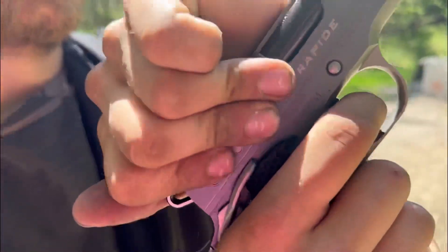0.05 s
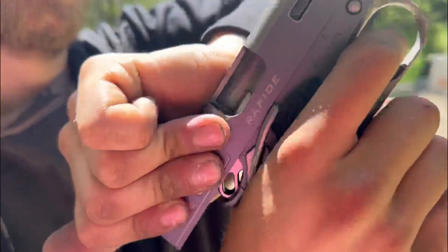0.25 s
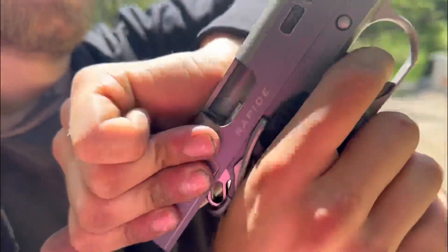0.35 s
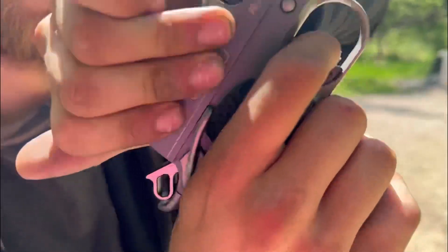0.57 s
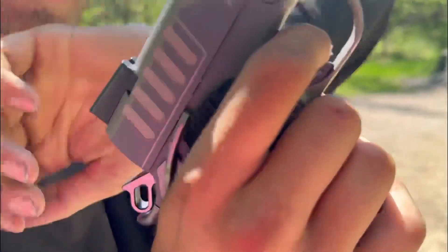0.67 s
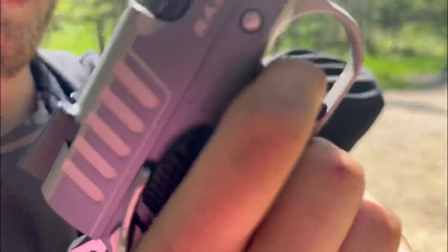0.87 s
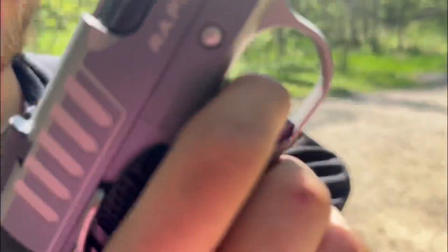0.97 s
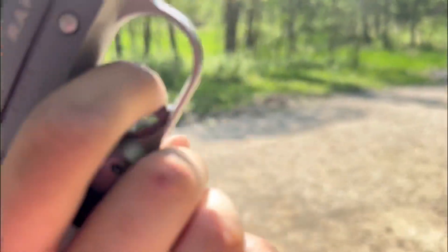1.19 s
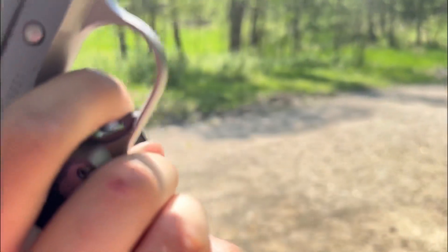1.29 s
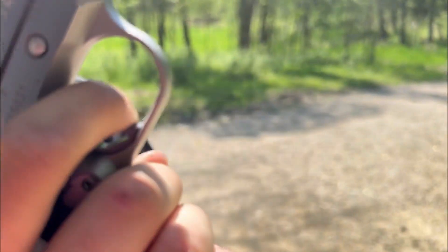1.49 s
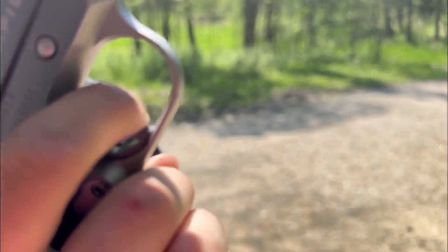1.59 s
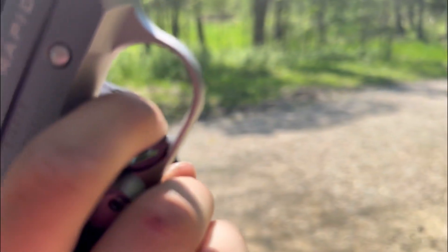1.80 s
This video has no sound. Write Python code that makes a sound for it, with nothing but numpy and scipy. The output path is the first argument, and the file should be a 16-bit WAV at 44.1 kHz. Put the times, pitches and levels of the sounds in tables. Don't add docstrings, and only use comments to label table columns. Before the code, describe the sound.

Empty handgun slide pulled back and snapped shut with crisp metallic clicks, then faint finger taps

```python
import sys
import numpy as np
from scipy import signal
from scipy.fft import rfft, irfft, next_fast_len
from scipy.io import wavfile
from scipy.ndimage import uniform_filter1d, map_coordinates

SR = 44100
rng = np.random.default_rng(int(sys.argv[2]) if len(sys.argv) > 2 else 0)


def to_linear_factor(level_db):
    exponent = np.asarray(level_db, float) / 20
    return 10 ** exponent


def file_out(sig):
    cols = np.atleast_2d(sig).T
    lim = np.clip(cols, -1, 1)
    pcm = np.round(lim * 32767).astype(np.int16)
    wavfile.write(sys.argv[1], SR, pcm)


N = 81585

# [f/Hz, correlation]
LIKENESS = [(60, 0.21), (380, 0.6), (2380, 0.027), (15000, 0.034)]


def unit(x):
    return x / np.sqrt(np.mean(x ** 2) + 1e-20)


def along(points, hz):
    f, v = np.transpose(points)
    return np.interp(np.log(hz + 1), np.log(f + 1), v)


def level(rows):
    s, db = np.transpose(rows)
    return to_linear_factor(np.interp(np.arange(N) / SR, s, db, left=-120, right=-120))


def wobble(rate_hz):
    knots = rng.standard_normal(int(N * rate_hz / SR) + 4)
    return map_coordinates(knots, [np.arange(N) * rate_hz / SR])


def filtered(x, response):
    m = next_fast_len(N + SR // 2)
    f = np.fft.rfftfreq(m, 1 / SR) + 1e-3
    return irfft(rfft(x, m) * response(f), m)[..., :N]


def add(track, s, x):
    part = track[..., round(s * SR):][..., :x.shape[-1]]
    part += x[..., :part.shape[-1]]


def peak(f, hz, width_hz):
    return 1j * f * width_hz / (hz * hz - f * f + 1j * f * width_hz)


def rush(spectrum, alike):
    def mid_side(f):
        angle = np.arccos(np.clip(along(alike, f), -1, 1)) / 2
        return to_linear_factor(along(spectrum, f)) * [np.cos(angle), np.sin(angle)]

    mid, side = filtered(rng.standard_normal((2, N)), mid_side)
    return unit(np.array([mid + side, mid - side]))


def patchy(x, depth_db):
    z = signal.stft(x, nperseg=512)[2]
    field = uniform_filter1d(rng.standard_normal(z.shape[1:]), size=9, axis=0)
    field = uniform_filter1d(field, size=12, axis=1)
    return unit(signal.istft(z * to_linear_factor(depth_db * unit(field)), nperseg=512)[1][:, :N])


def wind():
    # [t/s, level/dB]
    gusts = [(0, -69.5), (.7, -70.5), (.92, -70.5), (1.0, -65.5), (1.6, -73.5), (1.74, -66.5), (1.85, -75)]
    # [f/Hz, level/dB]
    rumble_spectrum = [(20, -13.5), (50, 1.5), (130, -12), (260, -44)]
    # [t/s, level/dB]
    air = [(0, -73), (.55, -71), (.85, -67.5), (1.1, -67.5), (1.5, -70.5), (1.6, -72), (1.85, -73)]
    # [f/Hz, level/dB]
    leaf_spectrum = [(59, -34), (100, 0), (302, -1.5), (1500, -13.5), (3600, -19.5), (5500, -24),
                     (16000, -48.5)]
    rumble = to_linear_factor(1.0 + 2.7 * wobble(11)) * level(gusts) * rush(rumble_spectrum, [(50, 1.0)])
    leaves = patchy(rush(leaf_spectrum, LIKENESS), depth_db=2.0)
    return rumble + to_linear_factor(3.5 + 0.72 * wobble(25)) * level(air) * leaves


def trees(x, t60_s):
    t = np.arange(SR // 2) / SR
    tail = rng.standard_normal((2, len(t))) * to_linear_factor(-60 * t / t60_s) * (t > .012)
    tail = uniform_filter1d(tail, size=5)
    return signal.fftconvolve(x[None], tail / np.linalg.norm(tail[0]), axes=1)[:, :N]


def birds():
    # [t/s, length/s, start f/Hz, end f/Hz, level/dB]
    notes_sung = [(1.091, 0.041, 1390, 1360, -71), (1.207, 0.061, 6570, 6660, -72),
                  (1.275, .095, 7750, 5400, -70), (1.466, 0.0309, 6500, 5100, -72),
                  (1.531, 0.044, 4305, 4300, -72), (1.59, 0.078, 4680, 4520, -68),
                  (1.71, 0.0714, 4440, 4652, -73.5), (1.796, 0.066, 5230, 6200, -69),
                  (1.84, 0.048, 5050, 5113, -74), (1.755, 0.11, 2900, 3150, -78.5),
                  (0.924, .06, 1330, 1377, -74.5), (1.09, 0.11, 4700, 5300, -81.5),
                  (1.005, .04, 6300, 5500, -79.5), (.70, .11, 3000, 2400, -76)]
    glide, wet_db = 4.2, -2
    out = np.zeros(N)
    for s, length_s, from_hz, to_hz, db in notes_sung:
        u = np.arange(round(length_s * SR)) / (length_s * SR)
        jitter_hz = 14 * unit(uniform_filter1d(rng.standard_normal(len(u)), size=150))
        hz = to_hz + (from_hz - to_hz) * np.exp(-glide * u) + jitter_hz
        flutter = to_linear_factor(5 * unit(uniform_filter1d(rng.standard_normal(SR // 5), size=200))[:len(u)])
        whistle = np.sin(2 * np.pi * np.cumsum(hz) / SR)
        add(out, s, 0.73 * to_linear_factor(db) * np.sin(np.pi * u) ** 0.12 * flutter * whistle)
    return out * to_linear_factor([[1.5], [-1.5]]) + to_linear_factor(wet_db) * trees(out, 0.19)


def squeaks():
    # [t/s, length/s, start f/Hz, end f/Hz, level/dB]
    slips = [
        (.864, 0.0243, 1376, 907, -61.5),
        (1.415, 0.039, 1430, 583, -60.5),
    ]
    out = np.zeros(N)
    for s, length_s, from_hz, to_hz, db in slips:
        u = np.arange(round(length_s * SR)) / (length_s * SR)
        hz = from_hz * (to_hz / from_hz) ** u
        add(out, s, to_linear_factor(db) * np.sin(np.pi * u) ** .5 * np.sin(2 * np.pi * np.cumsum(hz) / SR))
    return out * to_linear_factor(3 * wobble(300))


def fingers():
    # [t/s, peak level/dB, f/Hz, snap level/dB]
    ticks = [(0.594, -47.5, 1400, -18), (.606, -54, 1080, 1), (0.6246, -50.5, 1100, -4),
             (.6238, -48, 2170, -25), (0.6388, -51, 1160, -25), (0.6497, -37, 1420, -35),
             (0.6492, -43.5, 725, -22), (0.66, -40.5, 1000, -13), (0.678, -49, 1300, -15),
             (.69, -53.5, 1100, -18), (1.014, -54, 400, -8), (1.075, -51, 400, -6.5),
             (1.104, -60, 1300, -4), (1.182, -57.5, 1500, -11), (1.218, -45, 520, -8),
             (1.221, -47.5, 2300, -23), (1.28, -48, 590, -3.5), (1.322, -48.5, 974, -32),
             (1.363, -44, 1810, -15.5), (1.38, -42.5, 1890, -21.5), (1.388, -41.5, 648, -18),
             (1.397, -53, 740, -2.5), (1.439, -49, 710, -14), (1.576, -65, 1500, -1),
             (1.614, -57.5, 2000, -9.5), (1.734, -57, 3000, 0.5)]
    # [t/s, level/dB]
    rub = [(.95, -71), (1.1, -75.5), (1.3, -73), (1.355, -68.5), (1.375, -54.5), (1.41, -62), (1.55, -80.5)]
    # [f/Hz, level/dB]
    rub_spectrum = [(180, -28.5), (300, -3.5), (1850, -11), (2210, -20.5), (5260, -21), (15000, -41)]
    tap_cycles, tap_db, snap_t60_s = 2.8, 2, .006
    out, t = np.zeros((2, N)), np.arange(SR // 40) / SR
    for s, db, hz, snap_db in ticks:
        tap = np.exp(-t * hz / tap_cycles * 2) * np.sin(2 * np.pi * hz * t)
        tap = tap * to_linear_factor(tap_db) * (1 - np.exp(-t * hz * 2))
        snap = uniform_filter1d(rng.standard_normal((2, len(t))), size=6)
        snap = snap * to_linear_factor(snap_db + 12 - 60 * t / snap_t60_s)
        add(out, s, to_linear_factor(db) * (tap * to_linear_factor([[1.5], [-1.5]]) + snap))
    return out + to_linear_factor(4 * wobble(250)) * level(rub) * rush(rub_spectrum, LIKENESS)


def thuds():
    # [t/s, level/dB, cutoff f/Hz]
    jolts = [
        (.244, -34.5, 149),
        (0.2619, -14.5, 125),
        (0.3061, -27.5, 212),
        (0.408, -40, 246),
        (0.426, -39.5, 208),
        (.437, -36, 252.4),
        (0.478, -33.5, 200),
        (.500, -43, 300),
        (1.158, -40.5, 58.5),
        (1.72, -46, 59.9),
    ]
    # [t/s, level/dB]
    tremor = [(.3, -55.5), (.34, -48), (.42, -43.5), (.47, -61), (.56, -57), (.65, -54), (.75, -80)]
    tremor_hz, lead_rad = 47, .1
    out, freq_hz = np.zeros(N), np.fft.rfftfreq(4096, 1 / SR)
    for s, db, hz in jolts:
        push = irfft(1 / (1 + 1j * freq_hz / hz) ** 2.45)[:2048]
        add(out, s, -to_linear_factor(db) * push / push.max())
    shake = np.sin(2 * np.pi * np.cumsum(tremor_hz + 4.2 * wobble(6.5)) / SR)
    out = out + level(tremor) * shake
    return filtered(out, lambda f: np.exp([[1j * lead_rad], [-1j * lead_rad]]) + 0 * f)


def scrape():
    # [t/s, level/dB]
    sliding = [(.15, -67), (.21, -54), (.231, -49), (.242, -26.5), (.266, -32.5), (.29, -42.5),
               (.35, -61.5), (.396, -57), (.408, -46), (.434, -40.5), (.441, -42), (.471, -26),
               (.4735, -52.5), (.485, -41.5), (.53, -56.5), (.59, -64.5), (.62, -61), (.78, -81)]
    # [f/Hz, level/dB]
    rails = [(350, -43), (600, -11.5), (3690, 0), (5830, -4.5), (9090, -2), (15000, -23.5), (16500, -24.5)]
    grit_per_s, grit_db, grit_spread_db = 800, -0.5, -5.5
    draw = rng.random((2, N))
    grit = (draw[0] < grit_per_s / SR) * to_linear_factor(-grit_spread_db * np.log(draw[1]))
    rough = 1 + to_linear_factor(grit_db) * unit(uniform_filter1d(grit, size=12))
    drive = rng.standard_normal((2, N)) * rough * to_linear_factor(2.5 * wobble(200))
    return level(sliding) * unit(filtered(drive, lambda f: to_linear_factor(along(rails, f))))


def rings():
    # [t/s, f/Hz, level/dB, t60/s]
    modes = [(.1765, 4330, -48, 0.017), (.1765, 1760, -47.5, 0.045), (.2062, 1060, -14.5, 0.018),
             (.2068, 4800, -18, 0.018), (.2075, 3355, -25, 0.036), (.2178, 3426, -22, 0.027),
             (.2216, 1680, -15.5, 0.014), (.222, 4200, -11, 0.009), (.2218, 8090, -10.5, .004),
             (.2428, 1105, -26, 0.038), (.2428, 3230, -26, 0.028), (.247, 3820, -27.5, 0.023),
             (.2618, 3600, -11, 0.013), (.261, 1846, -12, .013), (.2612, 1150, -23, 0.023),
             (.2622, 5230, -25, 0.065), (.2645, 8850, -26.5, .045), (.2735, 1940, -29, 0.049),
             (.2745, 3670, -30, .022), (.4374, 4620, -30.5, 0.0072), (.4376, 9560, -19, 0.01),
             (.4462, 1486, -31, 0.023), (.4662, 9630, -8, 0.0071), (.4665, 5000, -22.5, 0.0086),
             (.4782, 2108, -13.5, 0.035), (.478, 1140, -25.5, 0.0045), (.4775, 595, -22.5, 0.012),
             (.478, 4985, -15, 0.0075), (.488, 2490, -32, 0.058)]
    out, t = np.zeros((2, N)), np.arange(SR // 5) / SR
    for s, hz, db, t60_s in modes:
        drift_rad = np.cumsum(rng.normal(0, .07, (2, len(t))), axis=1)
        onset = (1 - np.exp(-t * hz * 1.04)) ** 2
        add(out, s, to_linear_factor(db - 60 * t / t60_s) * np.sin(2 * np.pi * hz * t + drift_rad) * onset)
    return out


def contacts():
    times_s = [.1182, .1252, .172, .1763, .2064, .2173, .2214, .2422, .2455, .2606, .262, .2745, .2844,
               .4005, .409, .4372, .4442, .4472, .4575, .4659, .4695, .4778, .624]
    # [peak level/dB, frame modes/dB, slide modes/dB, chatter length/ms]
    strengths = [(-49, -8, -6, 2.9), (-48.5, -0.5, -17.5, 2.6), (-44, -20.5, -10, 3.3), (-43, -2, -5, 6.6),
                 (-4.5, -19.5, -12.5, 3.5), (-13.5, -14.5, -6, 2.7), (-8, -17.5, -5.5, 1.8),
                 (-16.5, -21.5, -13, 6), (-22.5, -13, -7, 3), (-7.5, -21, -7, 2.7), (-15.5, -13, -2, 1.5),
                 (-35, -9, -3, 1.6), (-24, -18.5, -6, 1.5), (-32.5, -18, -11, 2.3), (-27.5, -21, -12.5, 9),
                 (-18.5, -17.5, -20, 1.6), (-29, -12.5, -11.5, 1.5), (-17.5, -23, -13, 4.4),
                 (-21, -15, -12, 3.8), (-6.5, -21, -12.5, 1.3), (-22.5, -9.5, -8, 0.99),
                 (-9, -12, -1.5, 1.1), (-54.5, -13, -10, 4)]
    # [f/Hz, width/Hz, level/dB]
    steel = [(1130, 140, -3), (1670, 190, -3), (2090, 88, -4), (3750, 260, -1), (4170, 88, -2),
             (5280, 37, -3), (9000, 150, 0), (10100, 90, -3)]
    widen, min_width_hz, broad_db = 1.3, 300, -7.5
    rise_s, top_s, spike, blow = .0003, .004, 2.3, 8.3
    t, size = np.arange(1024) / SR, 2048
    f, out = np.fft.rfftfreq(size, 1 / SR), np.zeros((2, N))
    frame = 1 / (1 + (f / 2700) ** 8)
    parts = 1 / (1 + (6500 / (f + 1)) ** 8)
    ends = to_linear_factor(along([(420, -29.5), (850, -5), (12500, 3.0), (17000, -13)], f))
    for s, (db, frame_db, slide_db, length_ms) in zip(times_s, strengths):
        shape = np.minimum(np.exp((t - top_s) / rise_s), np.exp((top_s - t) * 2000 / length_ms))
        chatter = rng.standard_normal((2, len(t))) * (shape + spike * shape ** 4)
        chatter[0, round(top_s * SR)] += blow
        scatter_db = rng.normal(0, 2, len(steel))
        body = to_linear_factor(broad_db)
        for k, (hz, width_hz, mode_db) in enumerate(steel):
            mode = peak(f, hz, max(widen * width_hz, min_width_hz))
            body = body + (-1) ** k * to_linear_factor(mode_db + scatter_db[k]) * mode
        for share, part_db in (frame, frame_db), (1 - frame - parts, slide_db), (parts, 0):
            hit = irfft(rfft(chatter, size) * body * ends * share, size)
            add(out, s - .0035, to_linear_factor(db + part_db) * hit / np.abs(hit[0]).max())
    return out


def ports(x):
    # [f/Hz, phase/rad]
    lead = [(0, 0), (1000, .6), (1700, .9), (2300, 4.7), (3500, 7.9), (5000, 8), (8100, 8.7), (11000, 6.4),
            (13600, 5.2), (16000, 4)]
    # [f/Hz, level/dB]
    lean = [(300, -1), (1000, 3.5), (2400, 1), (5000, 6.5), (9000, 5.5), (15000, -4.5)]
    spread = .3
    pair = np.array([x[0] + spread * x[1], x[0] - spread * x[1]])
    side = np.array([[.5], [-.5]])

    def response(f):
        phase_rad = np.interp(f, *np.transpose(lead))
        return to_linear_factor(side * along(lean, f)) * np.exp(1j * side * phase_rad)

    return filtered(pair, response)


def scene():
    gun = contacts()
    forest = wind() + birds() + to_linear_factor(-29) * trees(gun[0], t60_s=.33)
    hand = squeaks() + fingers() + thuds()
    return forest + hand + ports(gun + rings() + scrape())


def roll_off(x):
    return signal.sosfilt(signal.butter(12, 17040, fs=SR, output="sos"), x)


def record(dry):
    lag_cycles, low_hz, low_q = 1.2, 51.6, 1.215

    def phone(f):
        late = np.exp(-2j * np.pi * lag_cycles * np.log(1 + f / 30) + 2j * np.pi * f * lag_cycles / 20000)
        low_cut = -f * f / (low_hz ** 2 - f * f + 1j * f * low_hz / low_q)
        return late * low_cut * (f < 17040) / (1 + (f / 16300) ** 24)

    return roll_off(filtered(dry, phone))


dry = scene()
out = record(dry)
file_out(out)
```